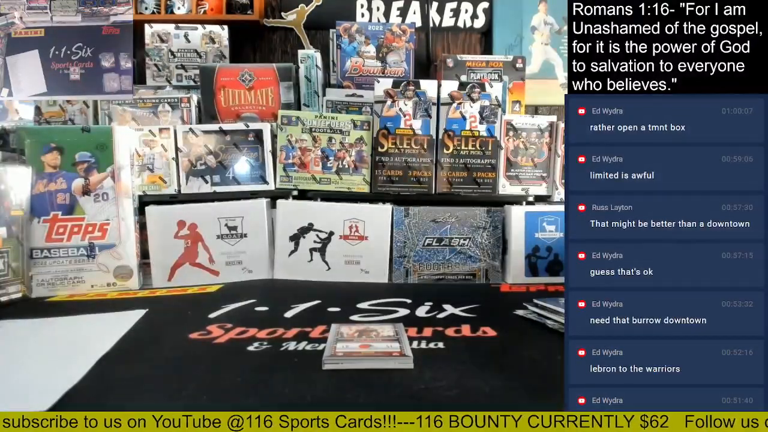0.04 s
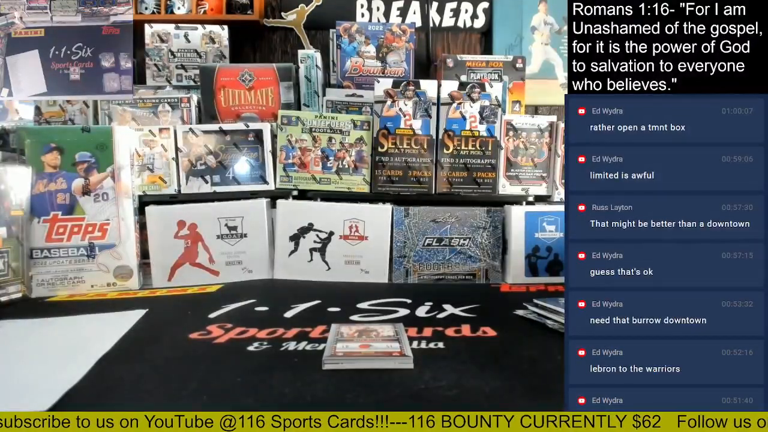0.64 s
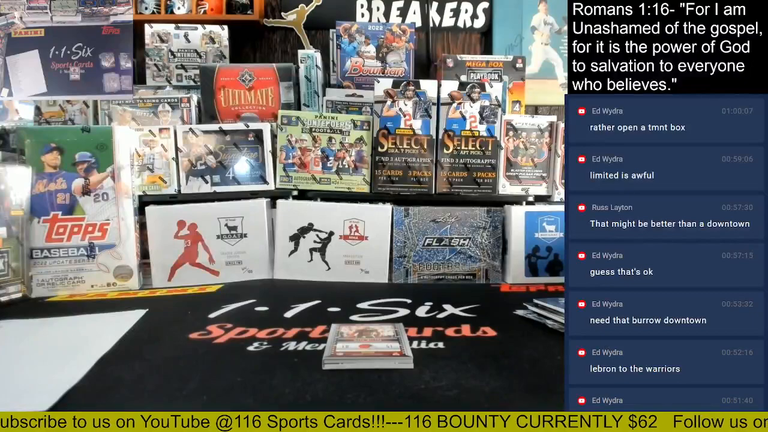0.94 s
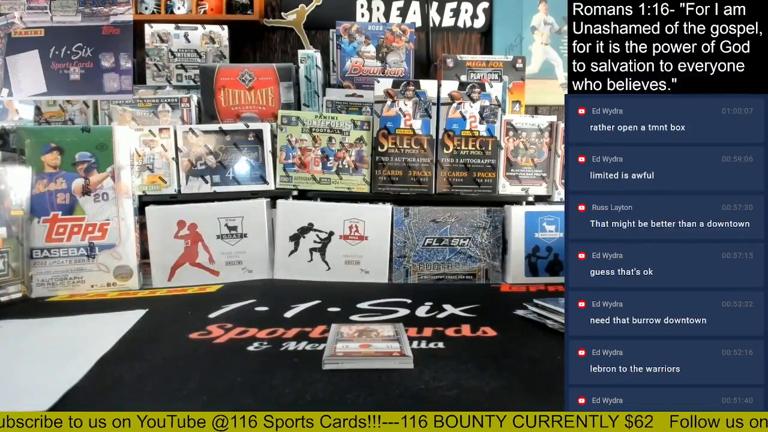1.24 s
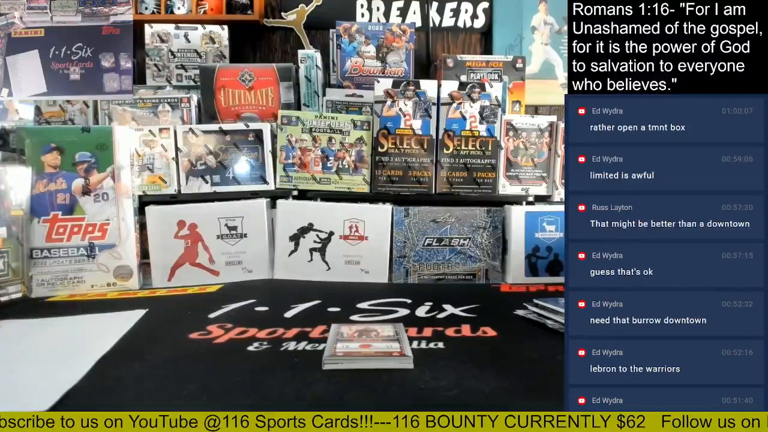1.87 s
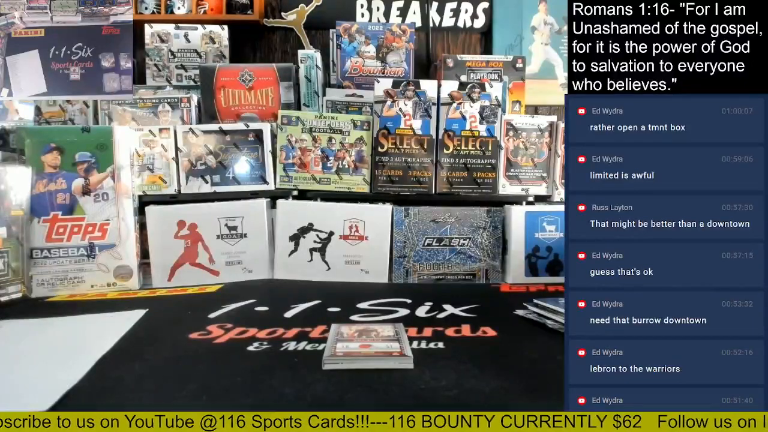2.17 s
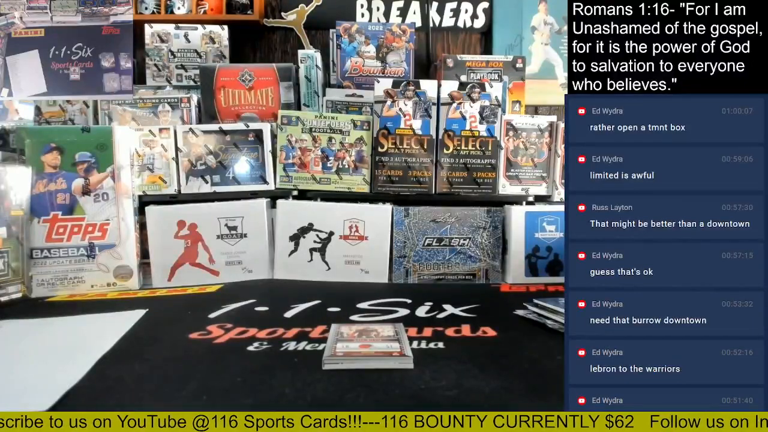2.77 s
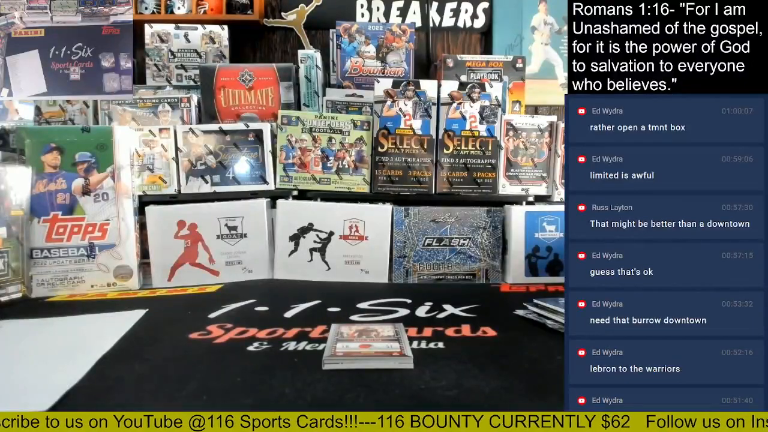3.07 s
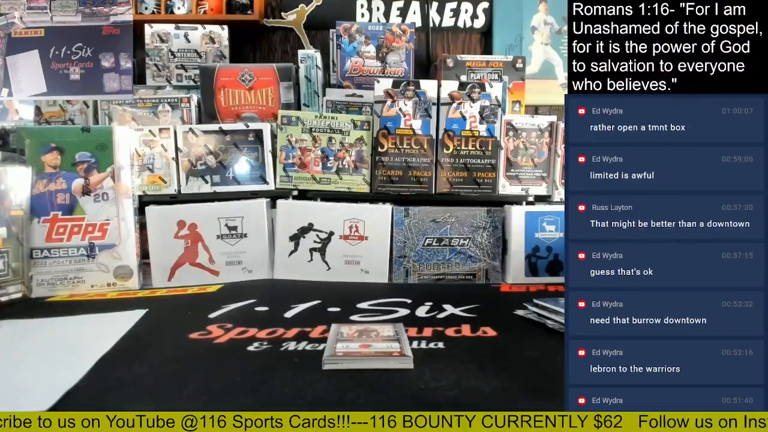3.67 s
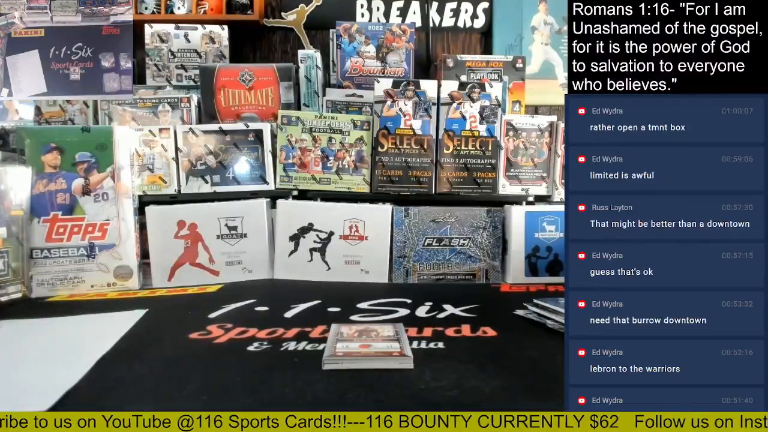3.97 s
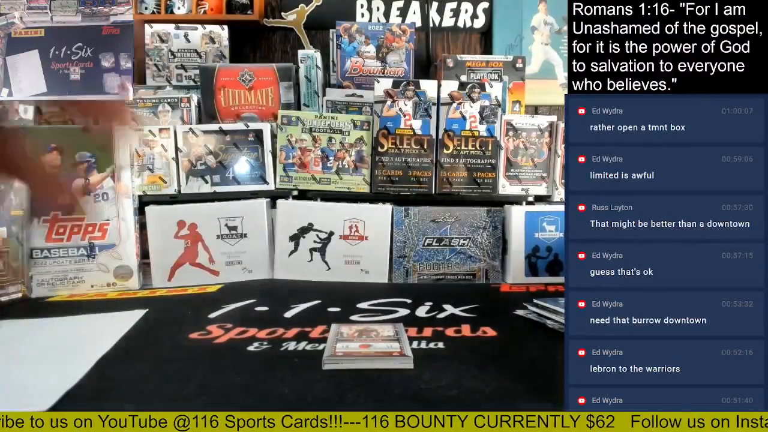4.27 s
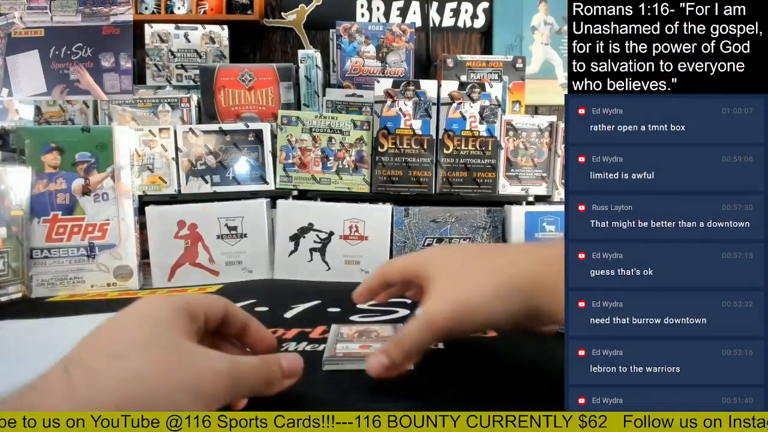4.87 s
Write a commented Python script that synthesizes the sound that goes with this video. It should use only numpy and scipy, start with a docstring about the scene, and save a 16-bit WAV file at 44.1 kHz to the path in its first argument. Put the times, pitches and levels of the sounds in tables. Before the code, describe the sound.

Over faint ventilation noise in a small room, scattered light clicks and brief hissing slides come from cards and plastic sleeves. Near the end, a soft scuff on a table mat leads to two sharp clacks from a hard plastic case. A deep thump, the loudest sound, carries through the table to the microphone standing on it, followed by a smaller bump, a little rustling and the start of another knock.

```python
"""Trading cards are handled at a mat-covered table in a small room with soft ventilation noise.
For four seconds, edges tick as they snap free and faces slide with friction on plastic sleeves.
After a soft scuff on the mat, a rigid plastic case clacks twice and rings. At 4.5 s something is set
down: a dull knock booms through the table into the microphone stand and rattles the case.
A lighter bump and a few card sounds follow, and another knock is just starting at the end."""
import sys
import numpy as np
from scipy import signal
from scipy.fft import rfft, irfft, next_fast_len
from scipy.io import wavfile

SR = 44100
rng = np.random.default_rng(int(sys.argv[2]) if len(sys.argv) > 2 else 0)


def dump_mix(stems):
    """Bounce the given channels to the path in sys.argv[1] as a 16-bit WAV at rate SR."""
    frames = np.atleast_2d(stems).T  # one column per channel
    limited = np.clip(frames, -1, 1)  # hard clip at full scale
    pcm = np.round(limited * 32767).astype(np.int16)
    wavfile.write(sys.argv[1], SR, pcm)


N = 221416
TIME = np.arange(N) / SR
SHORT_TIME = TIME[:SR // 3]

# The hollow ring of the plastic. Each row: frequency in Hz, bandwidth in Hz, gain in dB.
HOLLOW_MODES = [(1950, 106, 9), (2110, 126, -0.5), (2510, 60, -7), (2880, 270, -7), (3780, 300, -19),
                (7000, 4000, -28.5)]


def from_db(db):
    """Amplitude grows tenfold for every 20 dB."""
    return 10 ** (np.asarray(db) / 20)


def unit_rms(x):
    """Dividing by the rms amplitude gives unit mean power."""
    return x / np.sqrt(np.mean(x ** 2) + 1e-20)


def add(out, start_s, sound):
    """Superposition: a sound adds to what is already there."""
    start = min(round(start_s * SR), N)
    out[start:start + len(sound)] += sound[:N - start]


def coloured(x, spectrum):
    """Minimum-phase filtering: a causal response follows points of frequency in Hz and gain in dB."""
    size = 2 * next_fast_len(len(x) // 2 + SR // 20)
    hz, db = np.transpose(spectrum)
    grid_hz = np.maximum(np.arange(size // 2 + 1) * SR / size, 1)
    gain = from_db(np.interp(np.log(grid_hz), np.log(hz), db))
    cepstrum = irfft(np.log(gain))
    cepstrum[1:size // 2] *= 2   # folding onto positive time makes the filter causal
    cepstrum[size // 2 + 1:] = 0
    return irfft(rfft(x, size) * np.exp(rfft(cepstrum)))[:len(x)]


def resonate(x, modes):
    """Modal superposition: each mode is a damped resonator, ringing longer the narrower its band."""
    out = 0
    for hz, width_hz, db in modes:
        radius = np.exp(-np.pi * width_hz / SR)
        gain = (1 - radius ** 2) / 2
        feedback = [1, -2 * radius * np.cos(2 * np.pi * hz / SR), radius ** 2]
        out = out + from_db(db) * signal.lfilter([gain, 0, -gain], feedback, x)
    return out


def contact(length_s, room_db, t60_s=0.15):
    """Micro-impacts and early reflections merge into a burst; reverberation then decays exponentially."""
    flurry = np.exp(-(SHORT_TIME / length_s) ** 2)
    tail = from_db(room_db - 60 * SHORT_TIME / t60_s) * (1 - flurry)
    return rng.standard_normal(len(SHORT_TIME)) * np.hypot(flurry, tail)


def friction(slips_per_s, spread_db, smooth_db):
    """Stick-slip friction: uneven random impulses, blurred by reflections, over a smooth hiss."""
    sizes = from_db(spread_db * np.minimum(rng.exponential(1, N), 3))
    slips = (rng.random(N) < slips_per_s / SR) * sizes * rng.choice([-1, 1], N)
    blurred = signal.fftconvolve(slips, contact(length_s=0.0069, room_db=-14))[:N]
    return unit_rms(blurred) + from_db(smooth_db) * rng.standard_normal(N)


def stroke(start_s, length_s, attack_s=0.024, release_s=0.042):
    """Friction noise follows sliding speed: the hand speeds up, holds, then slows to rest."""
    rise = (TIME - start_s) / attack_s
    fall = 1 + (start_s + length_s - TIME) / release_s
    return np.clip(np.minimum(rise, fall), 0, 1)


def room_tone():
    """Ventilation gives a continuous noise spectrum; mains and fan add faint spectral lines."""
    # The air's spectrum. Each row: frequency in Hz, relative spectral density in dB.
    air_spectrum = [(12, -28.5), (20, 5.5), (33, -12), (92, -12.5), (109, -13), (157, -7.5), (207, -18.5),
                    (238, -8), (324, -17.5), (667, -23.5), (1100, -30), (1200, -30.5), (2610, -33.5),
                    (3000, -36), (15500, -40)]
    # Mains and fan tones. Each row: frequency in Hz, rms level in dB.
    hum_tones = [(120, -77), (143, -92), (239, -90)]
    air = from_db(-68.5) * unit_rms(coloured(rng.standard_normal(N), air_spectrum))
    hum = sum(from_db(db) * np.sqrt(2) * np.sin(2 * np.pi * (hz * TIME + rng.random()))
              for hz, db in hum_tones)
    return air + hum


def mat_scuff():
    """Forced vibration: friction drives the resonances of something hollow nudged over the cloth."""
    # Each row: resonance frequency in Hz, bandwidth in Hz, relative gain in dB.
    scuff_modes = [(868, 78, 1), (1000, 120, -5), (2500, 5600, -21.5)]
    scuff = unit_rms(resonate(rng.standard_normal(N), scuff_modes))
    return from_db(-68) * stroke(start_s=4.068, length_s=0.035) * scuff


def card_slides(sheen_exponent=1.56):
    """Sliding friction in a sleeve: the card's face rubs and rings the plastic while its edge hisses."""
    # Each row: start in seconds, length before release in seconds, level in dB, hiss gain in dB.
    strokes = [(0.062, 0.1, -81, -1), (0.192, 0.028, -84.5, 11.5), (0.24, 0.02, -67, -20),
               (0.672, 0.039, -73, -9), (0.815, 0.045, -70.5, 0.5), (0.862, 0.038, -72, 6.5),
               (0.943, .17, -75.5, 7), (1.144, 0.1, -74.5, 5), (1.23, 0.098, -75, 11.5),
               (1.502, 0.11, -78.5, 4), (2.614, .075, -73, 7.5), (2.708, 0.034, -72, -4),
               (2.758, 0.154, -77, 8.5), (3.229, 0.035, -71, -4), (3.849, .14, -68.5, -5),
               (4.022, .16, -75.5, -4.5), (4.197, 0.083, -67, -8), (4.677, 0.053, -67.5, -5),
               (4.759, 0.16, -76, -8), (4.93, .035, -64.5, -21)]
    # Face rub, edge hiss and high sheen. Each row: frequency in Hz, relative gain in dB.
    rub_spectrum = [(300, -8.5), (900, -1.5), (1900, -5.5), (3200, -4), (5000, -12.5), (10000, -29)]
    hiss_spectrum = [(1500, -17), (4200, -8.5), (7000, -4.5), (9500, -8), (14000, -25)]
    sheen_spectrum = [(4000, -22.5), (9000, 2.5), (12000, 1.5), (16000, -11)]
    grains = friction(slips_per_s=330, spread_db=2.5, smooth_db=-1)
    face = unit_rms(coloured(grains, rub_spectrum))
    ring = from_db(-12.5) * unit_rms(resonate(grains, HOLLOW_MODES))
    rub = from_db(-4.5) * unit_rms(face + ring)
    hiss = from_db(-4) * unit_rms(coloured(grains, hiss_spectrum))
    sheen = from_db(-14) * unit_rms(coloured(grains, sheen_spectrum))
    out = np.zeros(N)
    for start_s, length_s, db, hiss_db in strokes:
        brightness = from_db(hiss_db)
        slide = rub + brightness * hiss + brightness ** sheen_exponent * sheen
        out += from_db(db) * stroke(start_s, length_s) * slide
    return out


def card_ticks(max_fall_db=32):
    """Elastic release: an edge drags, then snaps free, high for a card's corner and low for a sleeve."""
    # Each row: start in seconds, rise time in seconds, relative level in dB, spectral peak in Hz,
    # fall to either side in dB per octave.
    snaps = [(0.0697, .003, -60.5, 3600, 10), (0.3268, .0005, -53.5, 8240, 31),
             (0.38, .0017, -63, 4460, 4.5), (0.4449, 0.00065, -41, 7840, 12),
             (0.9016, 0.00086, -41, 8400, 3), (0.9442, .0005, -54.5, 6500, 2.5),
             (0.986, 0.0016, -54, 8000, 2.5), (1.032, .0014, -53.5, 2010, 3),
             (1.115, .0027, -62.5, 9000, 8), (1.1612, .0004, -56, 9000, 3.5),
             (1.179, .0005, -53.5, 6500, 11), (1.2081, 0.00028, -51, 990, 3),
             (1.265, 0.0039, -51.5, 10000, 4), (1.327, .0015, -58.5, 3000, 8),
             (1.373, .0005, -61.5, 2320, 10), (2.0399, 0.0056, -62.5, 3500, 1.5),
             (2.454, 0.0038, -42.5, 1590, 6), (2.4658, 0.00058, -51, 1390, 1.5),
             (2.4918, .0009, -40.5, 6700, 8.5), (2.4935, 0.00087, -48, 1200, 5),
             (2.639, 0.0046, -53, 1890, 14), (2.7833, 0.0016, -55.5, 2000, 6), (2.858, 0.002, -51, 1800, 7),
             (2.8943, .0003, -53.5, 1900, 8), (2.9131, .0013, -55.5, 2450, 6),
             (3.1443, .0005, -60.5, 2000, 6.5), (3.1786, .0005, -57.5, 2800, 6),
             (3.39, .0004, -56.5, 3370, 5.5), (3.413, 0.0013, -52.5, 3500, 9),
             (4.501, .0005, -56.5, 1500, 5), (4.7378, .0005, -61.5, 2900, 9), (4.9426, .001, -54, 900, 10)]
    # The colour of thin card, common to all snaps. Each row: frequency in Hz, gain in dB.
    card_spectrum = [(150, 4.5), (800, -3), (1900, 1.5), (3000, -1), (4500, -2.5), (6000, -1), (8400, 1),
                     (12500, -4), (16000, -2.5)]
    octaves = np.arange(-6, 6, 0.5)
    out = np.zeros(N)
    for start_s, rise_s, db, peak_hz, slope in snaps:
        fall_db = np.minimum(slope * np.abs(octaves), max_fall_db)
        hump = np.transpose([peak_hz * 2 ** octaves, db - fall_db])
        swell = 1 - np.exp(-SHORT_TIME / (rise_s + 1 / SR))
        snap = swell * contact(length_s=0.013, room_db=-2.5)
        add(out, start_s, coloured(snap, hump))
    return from_db(2) * coloured(out, card_spectrum)


def case_rattles():
    """Impulse excitation: light touches and the jolt of the knock ring the case's hollow modes."""
    # Each row: start in seconds, relative level in dB.
    jolts = [(0.262, -70.5), (2.868, -67), (2.902, -63), (2.916, -59), (4.534, -62), (4.541, -53.5),
             (4.558, -57), (4.626, -57.5)]
    taps = np.zeros(N)
    for start_s, db in jolts:
        add(taps, start_s, from_db(db) * contact(length_s=0.0019, room_db=-10, t60_s=0.081))
    return from_db(16.5) * resonate(taps, HOLLOW_MODES)


def case_clacks(ring_db=3, spike_db=10, touch_db=15):
    """Hard, brief impacts are broadband: the case lands edge after edge, cracking and ringing."""
    # Each row: start in seconds, relative level in dB, bass gain in dB, treble gain in dB,
    # contact length in seconds.
    impacts = [(4.2693, -30, 11, -2.5, 0.0036), (4.2712, -30, 4, 1.5, 0.008), (4.274, -36, -21, -1, 0.0027),
               (4.285, -36.5, -26, 9, .002), (4.32, -26, -1.5, -0.5, 0.0033),
               (4.3253, -28.5, 5.5, 2.5, 0.0031)]
    # The crack of hard plastic. Each row: frequency in Hz, gain in dB.
    crack_spectrum = [(100, -13.5), (250, 1), (450, -11.5), (680, -1), (1000, 1), (1350, -6), (2150, 3.5),
                      (2500, 3), (3400, 3), (7500, 0), (11000, -8.5), (16000, -14)]
    # Each row: resonance frequency in Hz, bandwidth in Hz, gain in dB.
    case_modes = [(1015, 37, 2), (1060, 27, -12), (1768, 78, 5.5), (1830, 110, -9), (2220, 80, -2),
                  (2670, 62, -12), (2980, 45, 0.5), (3320, 84, 6.5), (3630, 84, -12), (3800, 82, -23),
                  (4440, 53, -17), (4620, 45, -16.5), (5140, 57, -1), (5620, 79, -19), (5930, 90, -12),
                  (7200, 35, -13), (7000, 90, -18), (7550, 55, -21), (9240, 47, 4)]
    hits, touches = np.zeros(N), np.zeros(N)
    impulse = signal.unit_impulse(len(SHORT_TIME))   # the hard first touch
    for start_s, db, bass_db, treble_db, length_s in impacts:
        tilt = [(1000, bass_db), (3000, 0.0035), (9000, treble_db)]
        hit = contact(length_s, room_db=-11, t60_s=0.16) + from_db(spike_db) * impulse
        add(hits, start_s, from_db(db) * coloured(hit, tilt))
        add(touches, start_s, from_db(db + touch_db) * coloured(impulse, tilt))
    ring = from_db(ring_db) * resonate(touches + 0.5 * hits, case_modes)
    return coloured(hits, crack_spectrum) + ring


def table_knocks(swell_cycles=1.0):
    """Structure-borne sound: a cushioned blow thuds; the table's modes swell, lowest last, and decay."""
    # Each row: start in seconds, boom gain in dB, boom tilt in dB per octave, thud gain in dB.
    blows = [(2.458, -57, 15, -66), (4.2754, -40, -7, -67), (4.324, -35.5, -4.5, -69),
             (4.5266, -19.5, 3.5, -38), (4.6218, -37, 2.8, -58), (5.012, -35, 15.5, -48)]
    # Table and microphone stand. Each row: frequency in Hz, relative level in dB, 60 dB decay in seconds.
    table_modes = [(19.75, -28, 3.2), (56, -5.5, 0.18), (79.4, -18, 0.58), (99.8, 6, 0.11),
                   (132.8, -13, 0.36), (174.1, 4, 0.23), (174.76, -29.5, 1.1), (204.6, -0.5, 0.11),
                   (255, -32, 0.32), (336.6, -13.5, 0.052), (405.3, -21.5, 0.063), (412, -40, 0.34)]
    # First contact through the mat. Each row: frequency in Hz, relative gain in dB.
    thud_spectrum = [(80, -48), (200, -34), (330, -14), (500, -17.5), (800, -20), (1230, -22.5),
                     (1700, -30.5), (3400, -37), (5000, -44.5), (15000, -65)]
    t = TIME[:2 * SR]
    hz, db, t60_s = np.transpose(table_modes)[:, :, None]
    swell = 1 - np.exp(-(hz * t / swell_cycles) ** 2)
    rings = from_db(db - 60 * t / t60_s) * np.sin(2 * np.pi * hz * t) * swell
    octaves = np.log2(hz / np.median(hz))
    boom, thud = np.zeros(N), np.zeros(N)
    for start_s, boom_db, tilt, thud_db in blows:
        add(boom, start_s, np.sum(from_db(boom_db + tilt * octaves) * rings, axis=0))
        add(thud, start_s, from_db(thud_db) * contact(length_s=0.0079, room_db=-1.5, t60_s=0.13))
    return boom + from_db(28) * coloured(thud, thud_spectrum)


def nearby_echoes(direct):
    """Comb filtering: reflections off the table and nearby boxes interfere with the direct sound."""
    # Each row: delay in seconds, amplitude as a fraction of the direct sound.
    reflections = [(.00111, 0.098), (.0052, .18), (.0077, 0.18)]
    out = direct.copy()
    for delay_s, gain in reflections:
        add(out, delay_s, gain * direct)
    return out


def scene():
    """All sources superpose at one microphone on the table."""
    handling = nearby_echoes(card_ticks() + card_slides() + case_clacks())
    return (handling + case_rattles() + table_knocks() + room_tone() + mat_scuff())[None]


def record(dry):
    """Band limiting: an elliptic low-pass filter cuts steeply above 15.9 kHz."""
    return signal.sosfilt(signal.ellip(10, 0.2, 80, 15900, fs=SR, output="sos"), dry)


dry = scene()
out = record(dry)
dump_mix(out)
```